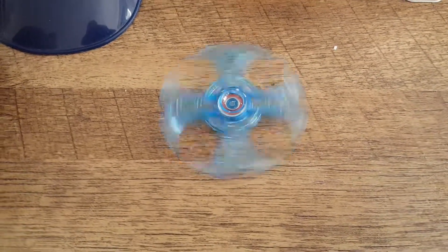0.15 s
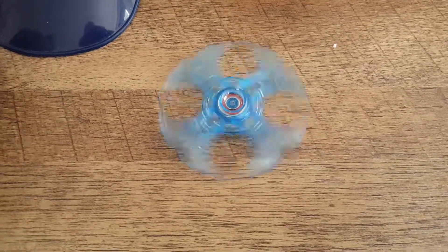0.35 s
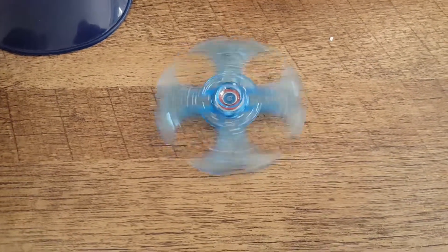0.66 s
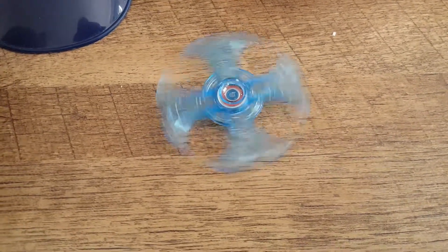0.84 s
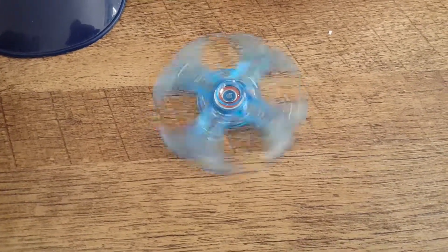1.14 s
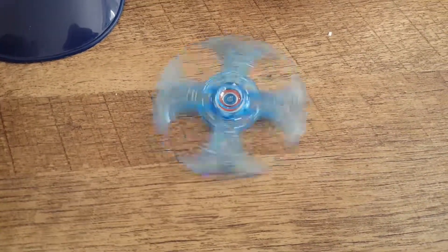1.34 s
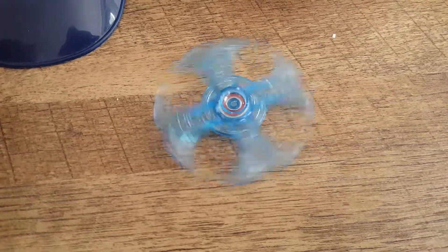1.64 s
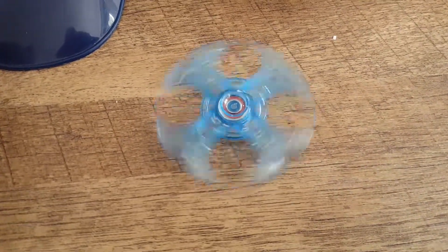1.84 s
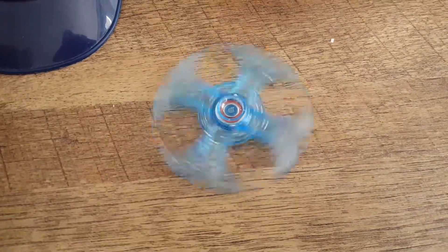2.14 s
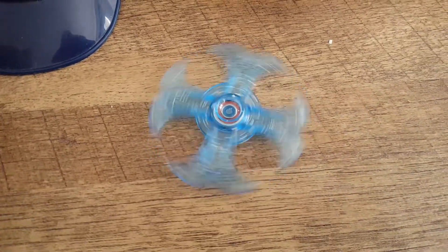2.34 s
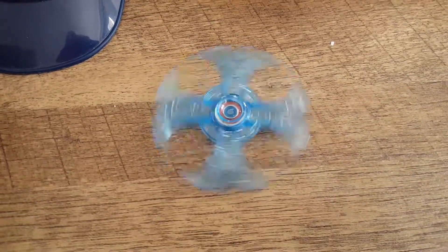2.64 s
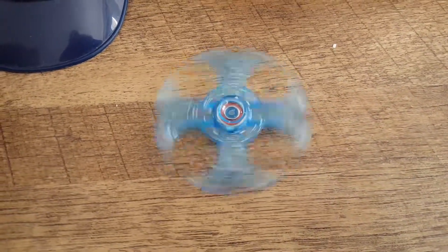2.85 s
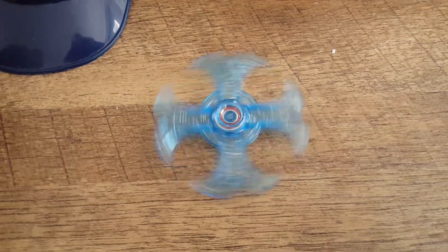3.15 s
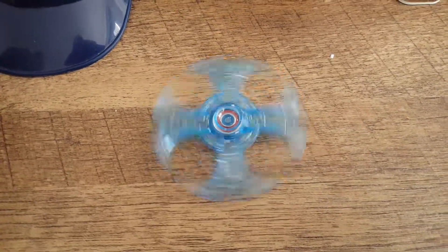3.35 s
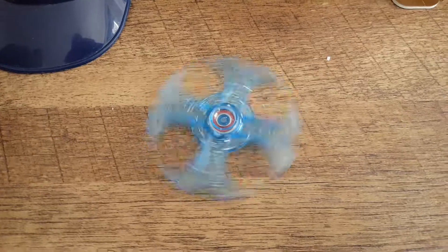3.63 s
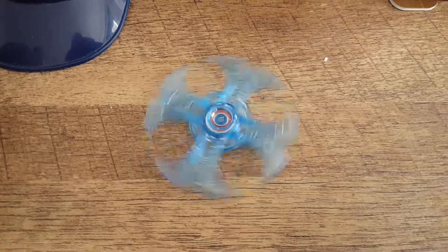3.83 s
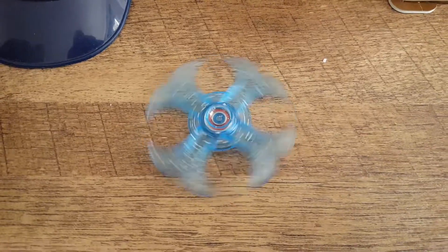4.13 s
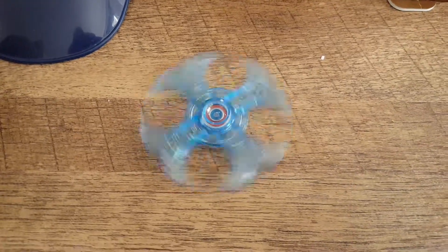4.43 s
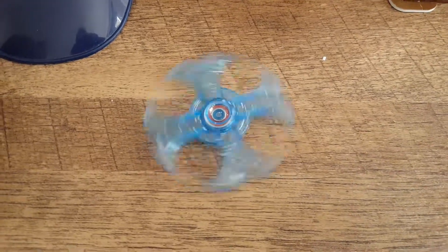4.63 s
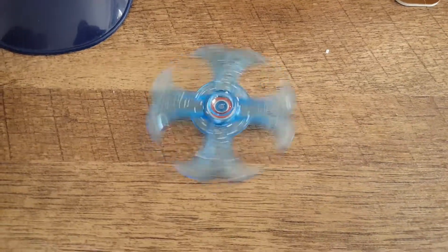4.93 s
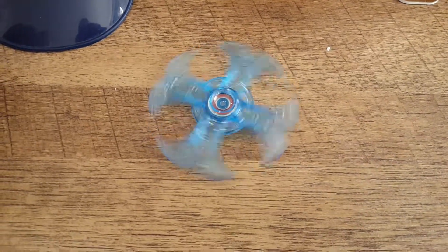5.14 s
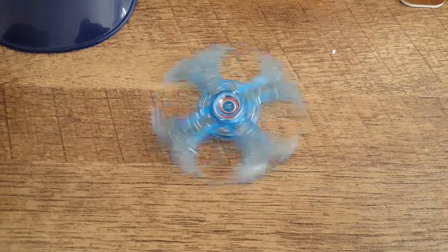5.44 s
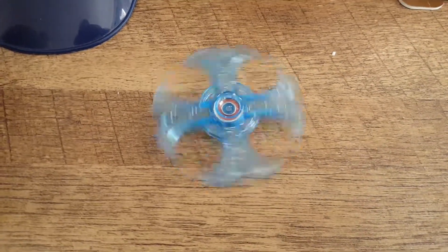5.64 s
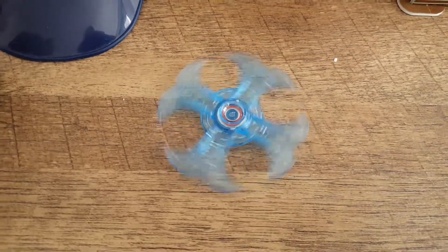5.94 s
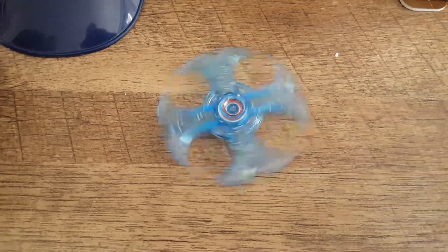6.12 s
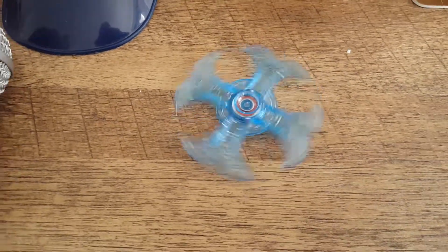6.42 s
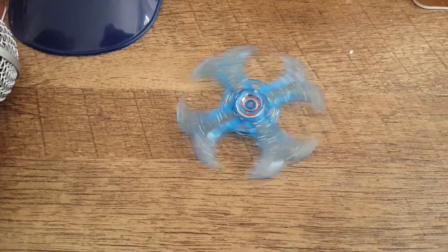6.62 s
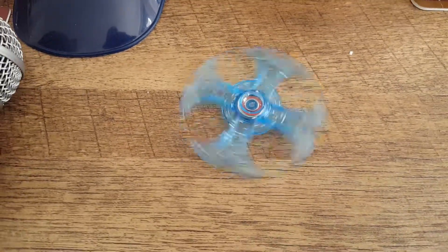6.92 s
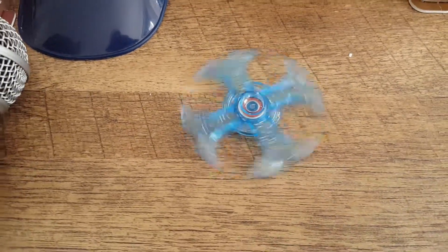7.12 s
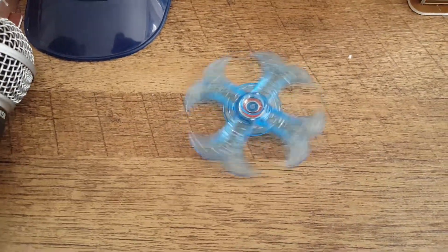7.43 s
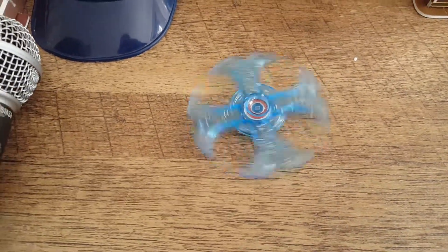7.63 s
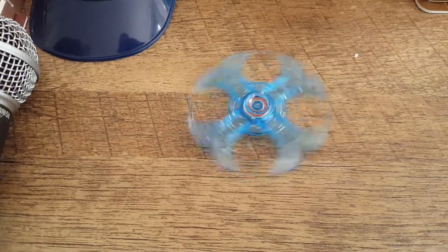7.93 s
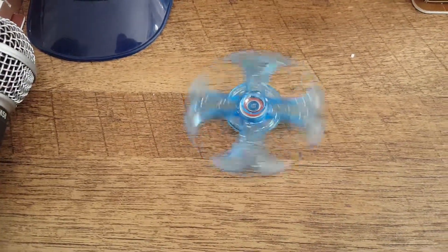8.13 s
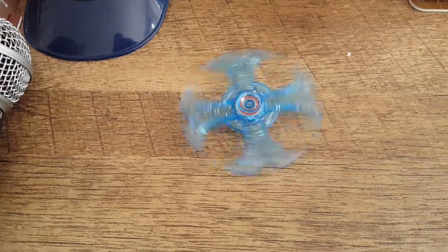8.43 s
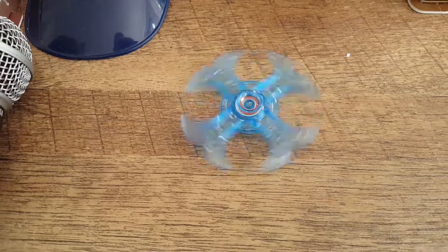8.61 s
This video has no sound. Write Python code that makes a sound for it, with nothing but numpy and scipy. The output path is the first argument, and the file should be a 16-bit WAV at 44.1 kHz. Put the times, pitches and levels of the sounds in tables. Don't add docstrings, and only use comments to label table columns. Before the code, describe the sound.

Soft, slowly fading bearing whir with tiny metallic rattles over low room drone, broken by brief squeaks, rubs and taps close to the microphone.

```python
import sys
import numpy as np
from scipy import signal
from scipy.fft import rfft, irfft, next_fast_len
from scipy.io import wavfile

SR = 44100
rng = np.random.default_rng(int(sys.argv[2]) if len(sys.argv) > 2 else 0)


def how_loud(loudness_db):
    steps = np.asarray(loudness_db, float) / 20
    return 10 ** steps


def to_wav(sig):
    pcm = np.clip(np.atleast_2d(sig), -1, 1) * 32767
    pcm = np.round(pcm).astype(np.int16)
    wavfile.write(sys.argv[1], SR, pcm.T)


N = 386757
LEFT_RIGHT = np.array([[1], [-1]])


def rms_one(x):
    return x / np.sqrt(np.mean(x ** 2) + 1e-20)


def at_hz(points, hz):
    table_hz, value = np.array(points).T
    return np.interp(np.log(hz), np.log(table_hz), value)


def drift(rate_hz):
    step = 40
    pole = np.exp(-2 * np.pi * rate_hz * step / SR)
    slow = signal.lfilter([1], [1, -2 * pole, pole ** 2], rng.standard_normal(N // step + 2002))
    slow = slow[2000:]
    return np.interp(np.arange(N) / step, np.arange(len(slow)), rms_one(slow - slow.mean()))


# (frequency [Hz], density [dB per Hz])
AIR_SPECTRUM = [(18, -25), (64, -13.5), (94, -9), (126, -3), (204, -13.5), (267, -10), (538, -21.5),
                (600, -22.5), (744, -25.5), (948, -19.5), (1460, -27.5), (2130, -24), (3640, -37.5),
                (6000, -43.5), (15600, -47.5)]
# (frequency [Hz], width [Hz], lift [dB])
STANDING_WAVES = [(51.8, 7.1, 5.5), (84, 3.1, 3.5), (102.4, 11, 6), (127.5, 18.6, 3.5), (163.8, 13, 6.5),
                  (183.6, 7.2, 8), (246, 3, 4.5), (305, 3.9, 2.5), (341, 27, 7), (395, 27, 3),
                  (420, 9.6, 4.5), (454, 24, -8.5), (502, 11, 3.5)]
# (frequency [Hz], left-right likeness [0-1])
COHERENCE = [(25, .86), (60, 1), (300, 0.75), (450, 0.7), (900, 0.46), (2000, 0), (15000, .02)]


def room_air():
    level_db, lag_s = -49.5, 0.00016
    size = next_fast_len(N)
    hz = np.maximum(np.arange(size // 2 + 1) * SR / size, 1)
    lift_db = sum(db / (1 + (2 * (hz - f) / width) ** 2) for f, width, db in STANDING_WAVES)
    alike = np.clip(at_hz(COHERENCE, hz), 0, 1)
    mid, side = rfft(rng.standard_normal((2, size)))
    pair = np.sqrt(1 + alike) * mid + np.sqrt(1 - alike) * side * LEFT_RIGHT
    pair[1] *= np.exp(-2j * np.pi * hz * lag_s)
    air = irfft(pair * how_loud(at_hz(AIR_SPECTRUM, hz) + lift_db), size)[:, :N]
    return how_loud(level_db) * rms_one(air) * how_loud(0.3 * LEFT_RIGHT)


TONE_HZ = [60, 120, 165.5, 202, 221.5, 240.6, 257.3, 258.4, 276.8, 304.5, 364.7]
# (rms level [dB], waver [dB])
TONE_LEVELS = [(-66, 2.5), (-48.5, .6), (-59, 3), (-70, 3), (-66, 1.5), (-69, 5), (-66, 1.5), (-59, 1.5),
               (-74, .6), (-71, 3), (-70, 2.5)]


def drone():
    t = np.arange(N) / SR
    tones = np.zeros(N)
    for hz, (db, waver_db) in zip(TONE_HZ, TONE_LEVELS):
        level = how_loud(db + waver_db * drift(2.47))
        turns = hz * t + rng.random() + 0.054 * drift(0.36)
        tones += level * np.sin(2 * np.pi * turns)
    return np.sqrt(2) * tones * how_loud(0.4 * LEFT_RIGHT)


# (start [s], end [s], frequency [Hz], rms level [dB])
WHISTLE_TONES = [
    (4.05, 5.0, 9760, -93),
    (5.2, 6.1, 9390, -91),
    (6.6, 7.55, 9740, -87.5),
    (7.6, 8.77, 9360, -90),
]


def whistles():
    out, t = np.zeros((2, N)), np.arange(N) / SR
    for start, end, hz, db in WHISTLE_TONES:
        fade = np.clip(np.minimum(t - start, end - t) / 0.08, 0, 1)
        phase = 2 * np.pi * np.cumsum(hz + 25 * drift(1.0)) / SR
        out += fade * how_loud(db + 3) * np.sin(phase)
    return out


# (time [s], length [ms], low edge [Hz], high edge [Hz], rms level [dB])
FINGER_RUBS = [(0.0518, 2.0, 3700, 5370, -48), (0.263, 2, 3000, 6000, -61), (1.7968, 3, 9900, 14400, -39),
               (1.7975, 2.5, 4500, 9560, -53), (2.594, 1.5, 4800, 8000, -60), (2.604, 9, 9000, 11000, -62),
               (2.622, 5, 4800, 5540, -56), (2.6192, 2.5, 3000, 12000, -52), (2.605, 9, 3000, 5500, -60),
               (2.639, 3, 9000, 12000, -59), (3.5727, 0.6, 3000, 9200, -49), (4.568, 31, 1490, 5950, -53.5),
               (4.568, 31, 6000, 14000, -61), (5.2548, 3.0, 2000, 12000, -52.5),
               (5.737, 4, 3300, 4200, -59), (5.750, 3.1, 4200, 9000, -54), (5.757, 5, 3200, 5200, -63),
               (5.819, 12, 3200, 4940, -59.5), (6.16, 3.6, 4300, 5230, -58), (8.036, 2.5, 1200, 5000, -56),
               (8.038, 5, 4000, 5800, -60)]


def rubs():
    pan_db = -6
    out, t = np.zeros((2, N)), np.arange(1500) / SR
    for s, ms, low_hz, high_hz, db in FINGER_RUBS:
        grit = rng.standard_normal((2, len(t))) * rng.exponential(1, len(t))
        stroke = np.sin(np.pi * np.clip(t * 1000 / ms, 0, 1) ** 0.6)
        band = signal.butter(2, [low_hz, high_hz], "band", fs=SR, output="sos")
        burst = rms_one(signal.sosfilt(band, grit * stroke)) * np.sqrt(np.mean(stroke ** 2))
        i = round(s * SR)
        out[:, i:i + len(t)] += burst * how_loud(db + pan_db / 2 * LEFT_RIGHT)
    return out


# (time [s], length [ms], start frequency [Hz], end frequency [Hz], level [dB])
CASE_SQUEAKS = [(0.052, 7, 2700, 2550, -53), (2.608, 4, 2500, 2700, -52), (2.6115, 4.5, 2700, 3100, -52),
                (2.6193, 7, 2750, 2650, -45.5), (2.6195, 4, 1600, 1600, -50),
                (2.6192, 3.2, 5150, 5200, -45), (2.638, 4.5, 2800, 2900, -54), (5.610, 7, 2680, 2680, -57),
                (5.735, 11, 2650, 2650, -50), (5.757, 6, 2650, 2600, -56), (5.913, 6, 2800, 2800, -58),
                (5.823, 7, 2650, 2650, -55), (5.870, 7, 2700, 2700, -58), (5.975, 10, 2750, 2750, -55)]


def squeaks():
    overtone_db, hard_db, growth = -31, -52, 1.8
    out = np.zeros((2, N))
    for s, ms, start_hz, end_hz, db in CASE_SQUEAKS:
        i, n = round(s * SR), round(ms * SR / 1000)
        jitter = 0.079 * np.cumsum(rng.standard_normal(n))
        phase = 2 * np.pi * np.cumsum(np.linspace(start_hz, end_hz, n)) / SR + jitter
        gone = np.linspace(0, 1, n)
        shape = np.sin(np.pi * gone ** 0.5)
        octave_db = overtone_db + growth * max(db - hard_db, 0) - 3.5 * LEFT_RIGHT - 26 * gone
        out[:, i:i + n] += how_loud(db) * shape * (np.sin(phase) + how_loud(octave_db) * np.sin(2 * phase))
    return out


# (time [s], port [0 left, 1 right], peak [dB],
# frequency [Hz, sign of the first swing], decay [cycles to die 60 dB])
CASE_TAPS = [
    (3.5724, 1, -16, -2700, 10),
    (3.5735, 1, -32, -380, 4),
    (5.4407, 1, -21, 900, 6),
    (5.4399, 0, -28, 3600, 12),
    (5.4401, 0, -29, -6000, 8),
    (5.4404, 0, -33, -2400, 12),
    (5.2548, 0, -29, -700, 4),
    (5.2548, 1, -28, -700, 4),
    (5.4550, 1, -30, -800, 5),
]


def taps():
    slowing = 1.64
    out, t = np.zeros((2, N)), np.arange(1500) / SR
    for s, port, db, signed_hz, cycles in CASE_TAPS:
        hz = abs(signed_hz)
        turns = np.log1p(slowing * hz * t) / slowing
        decay = how_loud(db - 60 * t * hz / cycles)
        onset = np.minimum(turns / 0.5, 1)
        i = round(s * SR)
        out[round(port), i:i + len(t)] += np.sign(signed_hz) * decay * onset * np.sin(2 * np.pi * turns)
    return out


def contacts(per_s, spread_db):
    sizes = how_loud(spread_db * np.minimum(rng.exponential(1, N), 4)) * rng.choice([-1, 1], N)
    return rms_one(sizes * (rng.random(N) < per_s / SR))


def heard(near, diffuse, lag_ms, share):
    late = np.interp(np.arange(N) - lag_ms * SR / 1000, np.arange(N), near)
    return np.sqrt(share) * np.array([near, late]) + np.sqrt(1 - share) * diffuse


def body(force, modes, flicker_db, top_force=None):
    out = 0
    for k, (hz, width_hz, level_db, pan_db) in enumerate(modes):
        pole = np.exp(-np.pi * width_hz / SR)
        coupling = how_loud(flicker_db * (drift(30.0) + 0.5 * drift(1.0)))
        push = (top_force if hz > 10000 else force) * coupling
        gain = (1 - pole ** 2) / 2
        feedback = [1, -2 * pole * np.cos(2 * np.pi * hz / SR), pole ** 2]
        rung = signal.lfilter([gain, 0, -gain], feedback, push)
        out = out + (-1) ** k * rung * how_loud(level_db + pan_db / 2 * LEFT_RIGHT)
    return out


# (frequency [Hz], width [Hz], level [dB], left minus right [dB])
TABLE_MODES = [(474.4, 7, 3, 1.5), (496.7, 10.8, -2, 5.5), (590, 26, -5.5, 5.5), (845, 33, -10.5, -4.5),
               (947, 16.4, -6.5, 2), (1003, 20, -20, -22), (1144, 20, -5.5, -1.5), (1378, 140, -6.5, 1.5),
               (1494, 41, -4, 9), (1639, 60, -8, 1.5), (1950, 99, -9.5, -1), (2423, 470, -16.5, 1)]


def table_whir(level_db, rattle):
    force = heard(contacts(2500, spread_db=0.5), rng.standard_normal((2, N)), lag_ms=0.22, share=0.33)
    rolling = how_loud(level_db + 22.0 + 0.28 * drift(39.0))
    return body(force * (rolling + how_loud(5.5) * rattle), TABLE_MODES, flicker_db=1.5)


# (frequency [Hz], width [Hz], level [dB], left minus right [dB])
RACE_MODES = [(4670, 380, -7.5, 7), (5370, 35, -5, 14), (5880, 550, -10, 7.5), (7420, 560, -6.5, 11.5),
              (8270, 490, -3.5, 8), (9370, 610, -8.5, 6), (10850, 350, -6, 2), (11450, 500, -8, -1),
              (12460, 340, -7.5, 5), (13260, 260, -1, 1), (14050, 750, -5, 3), (14700, 270, -13, 4),
              (15400, 600, -11, 3)]


def race_roll(level_db, rattle, top_rattle):
    force = heard(contacts(4000, spread_db=3.5), rng.standard_normal((2, N)), lag_ms=0.4, share=0.6)
    rolling = how_loud(level_db + 9.5 + 0.75 * drift(66.0) + 1.1 * drift(6.9))
    top_force = force * (rolling * how_loud(-0.3) + top_rattle)
    return body(force * (rolling + rattle), RACE_MODES, flicker_db=2.0, top_force=top_force)


# (time [s], level in the lower race modes [dB], level in the top modes
# [dB])
BALL_RATTLES = [(0.0391, -68, -63), (0.052, -68, -61), (0.071, -55, -65), (0.0945, -60, -68),
                (0.1687, -69, -58), (0.1794, -69, -55), (0.1873, -79, -61), (0.1927, -71, -61),
                (0.201, -70, -59), (0.211, -70, -61), (0.2178, -65, -61), (0.225, -52, -48),
                (0.2449, -63, -59), (0.2522, -59, -65), (0.3412, -71, -63), (0.3704, -52.5, -60),
                (0.4163, -68, -61), (0.427, -61, -79), (0.4417, -68, -60), (0.4603, -56, -55),
                (0.4831, -71, -66), (0.4944, -60, -62), (0.55, -59, -64), (0.5782, -68, -64),
                (0.6574, -72, -65), (0.7311, -73, -61), (0.7466, -71, -64), (0.7761, -80, -57),
                (0.7803, -60, -61), (0.8044, -66, -63), (0.9013, -50.5, -54), (0.9127, -65, -61),
                (0.9338, -68, -66), (1.0047, -63, -66), (1.0258, -59, -64), (1.1366, -67, -68),
                (1.1582, -52.5, -60), (1.195, -61, -68), (1.2041, -63, -68), (1.2499, -55, -64),
                (1.272, -61, -63), (1.277, -57, -62), (1.314, -56, -62), (1.3322, -63, -68),
                (1.3547, -65, -65), (1.3675, -58, -59), (1.3738, -55, -62), (1.3874, -66, -66),
                (1.3914, -70, -64), (1.4469, -63, -60), (1.5313, -52, -61), (1.5394, -64, -70),
                (1.5479, -65, -67), (1.6518, -69, -60), (1.6656, -67, -66), (1.7056, -64, -70),
                (1.8048, -54, -63), (1.8268, -73, -67), (1.8522, -64, -69),
                (1.864, -59, -62), (1.868, -58, -64), (1.8778, -51, -53), (1.8865, -55, -52),
                   (1.8997, -60, -71), (1.9652, -61, -57), (1.9979, -64, -62), (2.0058, -66, -64),
                   (2.068, -67, -61), (2.1478, -63, -69), (2.1593, -66, -69), (2.1909, -65, -67),
                   (2.1981, -57, -68), (2.2338, -58, -70), (2.2375, -61, -56), (2.278, -59, -68),
                   (2.2847, -64, -72), (2.3388, -58, -61), (2.4064, -58, -75), (2.4622, -62, -69),
                   (2.4661, -67, -71), (2.4712, -69, -70), (2.4748, -65, -67), (2.5537, -60, -55),
                   (2.5625, -69, -63), (2.6056, -66, -57), (2.6923, -81, -67), (2.7453, -58.5, -62),
                   (2.7665, -68, -71), (2.7819, -72, -69), (2.7984, -74, -69), (2.8401, -63, -63),
                   (2.8778, -65, -66), (2.8931, -69, -65), (2.9109, -68, -66), (2.9169, -65, -64),
                   (2.9235, -68, -66), (3, -58, -68), (3.005, -64, -50), (3.0136, -70, -66),
                   (3.0315, -64, -63), (3.0609, -76, -64), (3.1255, -58, -60), (3.1607, -61, -59),
                   (3.1663, -60, -72), (3.2118, -63, -67), (3.2434, -63, -65), (3.268, -58, -59),
                   (3.2842, -50.5, -46), (3.3004, -70, -64), (3.31, -64, -60), (3.3146, -62, -61),
                   (3.4273, -68, -67), (3.4516, -64, -62), (3.4785, -66, -69), (3.489, -60, -59),
                   (3.6182, -65, -64), (3.6362, -65, -60), (3.6496, -73, -62),
                (3.6673, -71, -66), (3.7687, -64, -69), (3.7984, -72, -69), (3.8097, -73, -81),
                (3.8179, -70, -69), (3.8703, -72, -72), (3.9073, -66, -63), (3.9247, -63, -54),
                (3.9657, -66, -62), (3.9775, -61, -61), (4.0948, -68, -57), (4.2019, -68, -59),
                (4.2086, -55, -49), (4.2178, -68, -64), (4.3059, -60, -57), (4.3153, -62, -55),
                (4.363, -54, -51), (4.5168, -60, -55), (4.5375, -72, -65), (4.5789, -62, -63),
                (4.6155, -62, -60), (4.628, -81, -65), (4.6562, -68, -65), (4.7023, -67, -75),
                (4.8355, -64, -65), (4.8412, -75, -66), (4.8467, -84, -67), (4.8666, -72, -69),
                (4.9164, -76, -66), (4.9539, -70, -72), (5.0438, -76, -63), (5.1252, -72, -68),
                (5.1334, -72, -65), (5.1456, -60, -56), (5.1563, -77, -68), (5.2162, -69, -75),
                (5.227, -66, -71), (5.2618, -64, -57), (5.2714, -62, -65), (5.2949, -59, -60),
                (5.3043, -59, -70), (5.3112, -72, -63), (5.3248, -63, -71), (5.3316, -70, -70),
                (5.3424, -66, -81), (5.4246, -63, -62), (5.4298, -57, -53), (5.4536, -64, -64),
                (5.5169, -71, -69), (5.6368, -67, -68), (5.6465, -66, -69), (5.6781, -73, -66),
                (5.684, -68, -77), (5.7078, -67, -64), (5.7221, -72, -67), (5.7979, -75, -70),
                (5.8257, -70, -56), (5.898, -68, -66), (5.98, -63, -53),
                (6.0791, -73, -85), (6.1201, -72, -71), (6.162, -57, -51), (6.2063, -67, -63),
                (6.3368, -71, -64), (6.3727, -71, -72), (6.3768, -68, -66), (6.4419, -71, -65),
                (6.4508, -65, -60), (6.4631, -78, -68), (6.6565, -67, -68), (6.6814, -58, -60),
                (6.7062, -70, -72), (6.8544, -58, -52), (6.8689, -76, -65), (7.0221, -66, -56),
                (7.0379, -76, -71), (7.0869, -75, -71), (7.0912, -74, -79), (7.1875, -67, -62),
                (7.2064, -63, -65), (7.2147, -72, -67), (7.2239, -68, -85), (7.2577, -68, -80),
                (7.2722, -61, -62), (7.2971, -69, -65), (7.3878, -70, -70), (7.3954, -72, -62),
                (7.4287, -71, -65), (7.5782, -70, -65), (7.5922, -72, -66), (7.6053, -69, -71),
                (7.7172, -64, -71), (7.7244, -63, -63), (7.7407, -67, -68), (7.7488, -70, -77),
                (7.7802, -79, -68), (7.8673, -68, -67), (7.8729, -73, -63), (7.8825, -72, -64),
                (7.889, -74, -67), (7.9024, -62, -58), (7.9133, -59, -48), (7.927, -56, -59),
                (7.9852, -67, -62), (8.1013, -60, -70), (8.1766, -89, -71), (8.1929, -73, -59),
                (8.3674, -73, -77), (8.3761, -72, -63), (8.3867, -73, -74), (8.4425, -72, -64),
                (8.4895, -64, -70), (8.5578, -66, -59), (8.5697, -68, -64), (8.5912, -71, -67),
                (8.5983, -68, -66), (8.6112, -79, -71), (8.7646, -58, -53),
                (1.883, -55, -57), (4.610, -70, -60), (5.4335, -60, -58), (5.437, -54, -51),
                     (7.917, -54, -54), (0.0915, -60, -68), (0.5435, -63, -60)]


def rattles():
    lead_s = 0.001
    rise_ms, t60_ms, low_push_db, top_push_db = 1, 17, 18.5, 21
    events = BALL_RATTLES
    s, low_db, top_db = np.transpose(events)
    starts = np.zeros((2, N))
    at = np.round((s - lead_s) * SR).astype(int)
    starts[:, at] = how_loud(np.array([low_db + low_push_db, top_db + top_push_db]))
    ms = np.arange(1000) * 1000 / SR
    bite = (1 - np.exp(-ms / rise_ms)) * how_loud(-60 * ms / t60_ms)
    return np.maximum(signal.fftconvolve(starts, bite[None], axes=1)[:, :N], 0)


def scene():
    t = np.arange(N) / SR
    rattle, top_rattle = rattles()
    background = room_air() + drone()
    recorder = whistles() + rubs() + squeaks() + taps()
    table = table_whir(-55.5 - 0.54 * t, rattle)
    race = race_roll(-63.5 - 1.4 * t, rattle, top_rattle)
    return background + recorder + table + race


def roll_off(x):
    return signal.sosfilt(signal.butter(12, 15740, fs=SR, output="sos"), x)


def record(dry):
    low_pass = signal.ellip(10, 0.5, 60, 15750, fs=SR, output="sos")
    mix = signal.sosfilt(low_pass, dry) - 0.0006
    return roll_off(mix)


dry = scene()
out = record(dry)
to_wav(out)
```